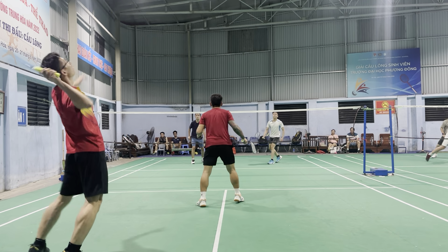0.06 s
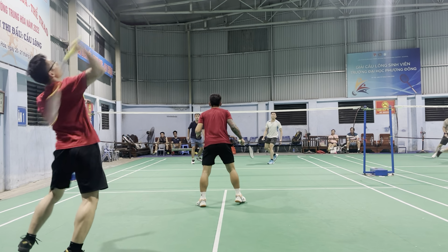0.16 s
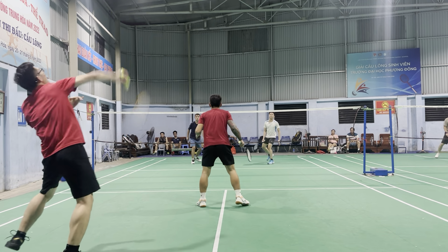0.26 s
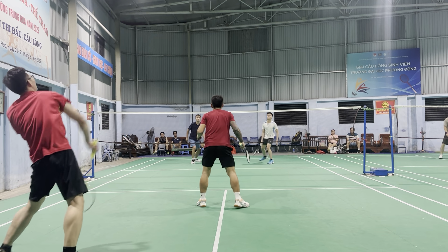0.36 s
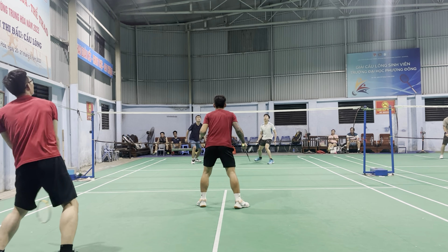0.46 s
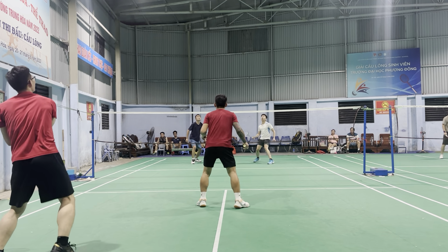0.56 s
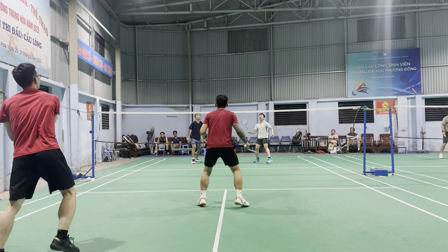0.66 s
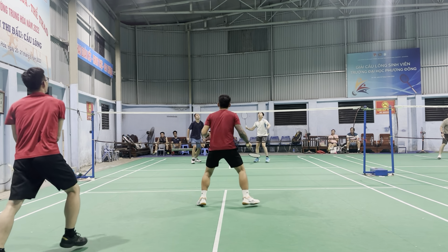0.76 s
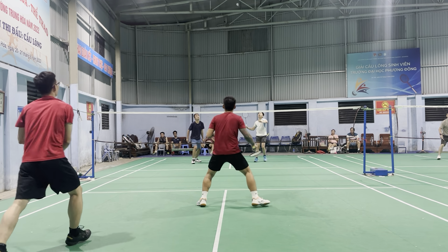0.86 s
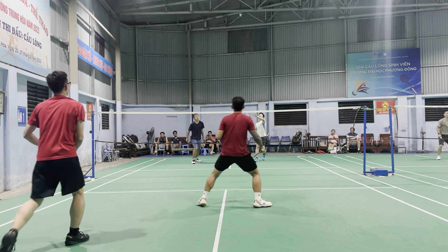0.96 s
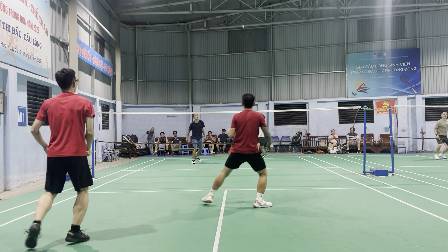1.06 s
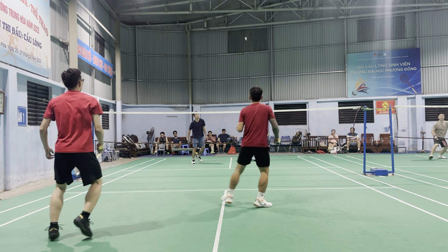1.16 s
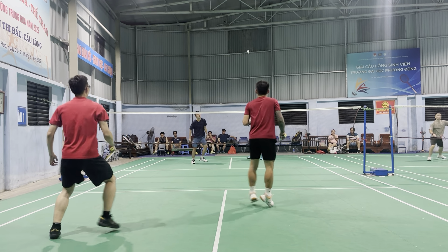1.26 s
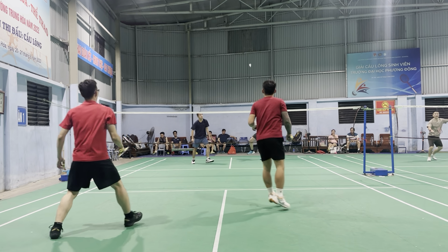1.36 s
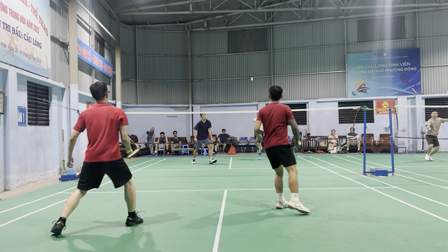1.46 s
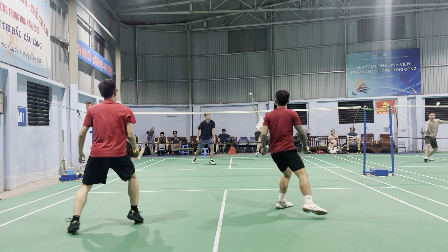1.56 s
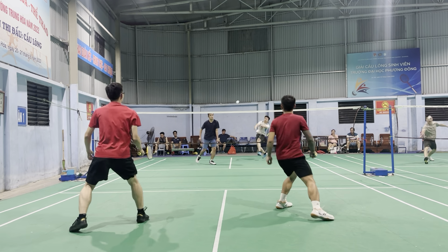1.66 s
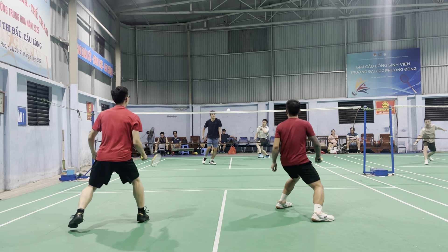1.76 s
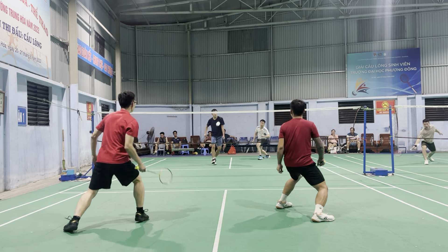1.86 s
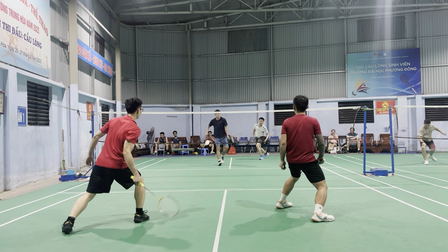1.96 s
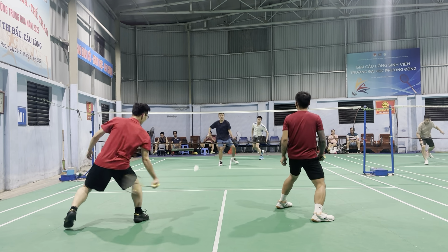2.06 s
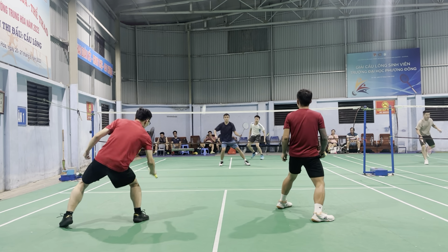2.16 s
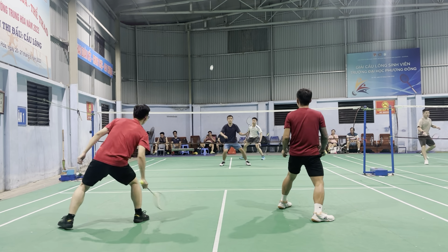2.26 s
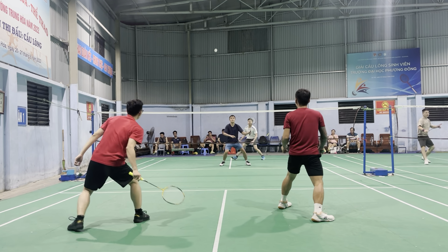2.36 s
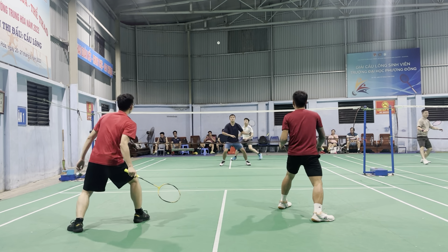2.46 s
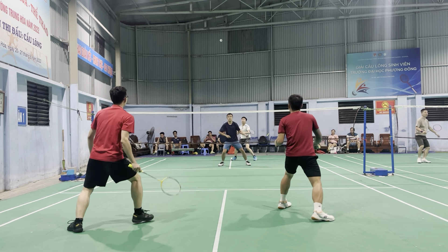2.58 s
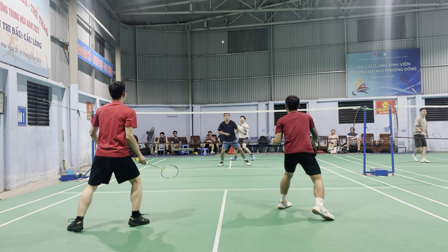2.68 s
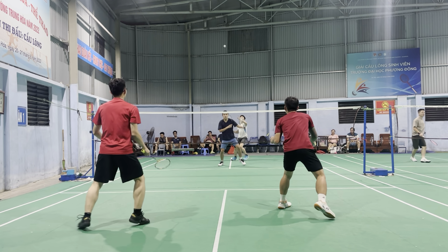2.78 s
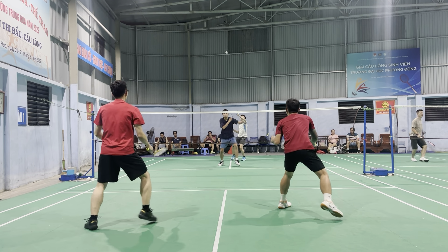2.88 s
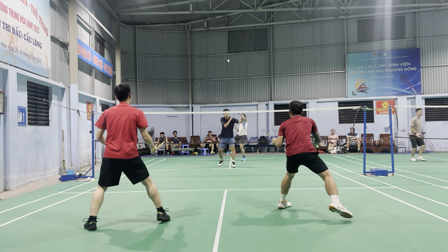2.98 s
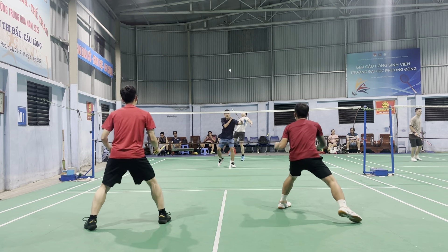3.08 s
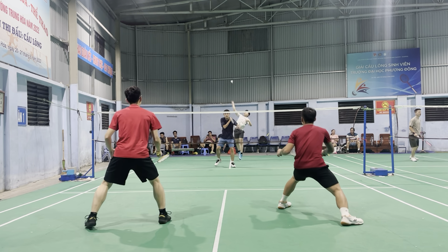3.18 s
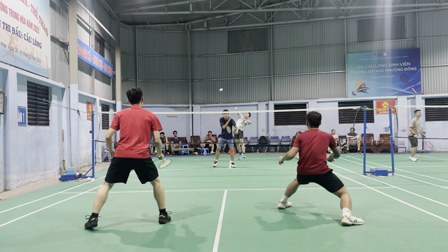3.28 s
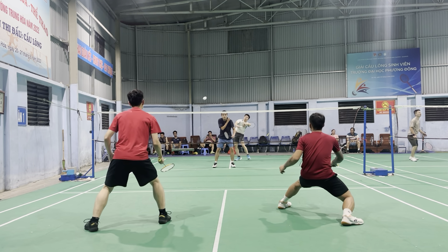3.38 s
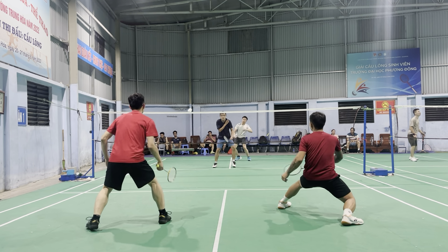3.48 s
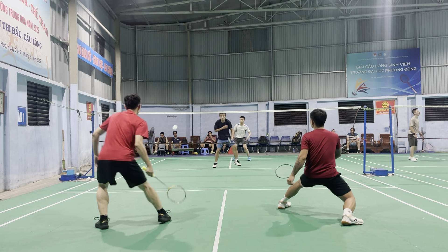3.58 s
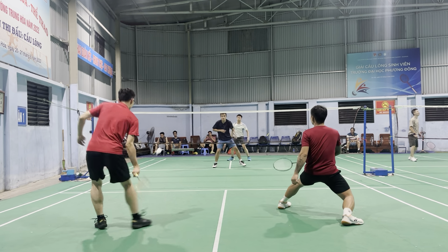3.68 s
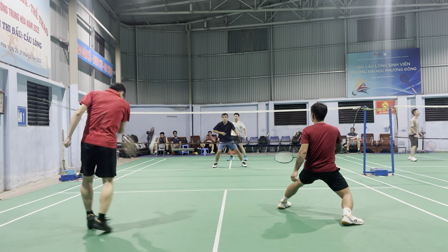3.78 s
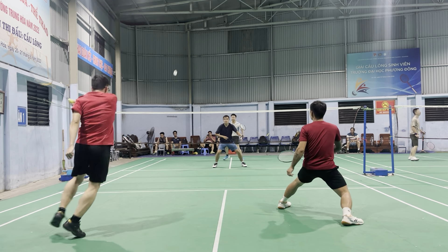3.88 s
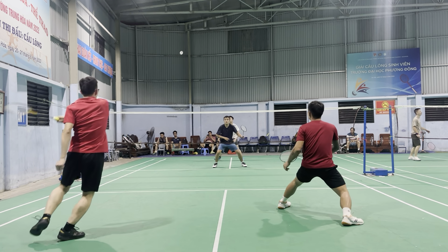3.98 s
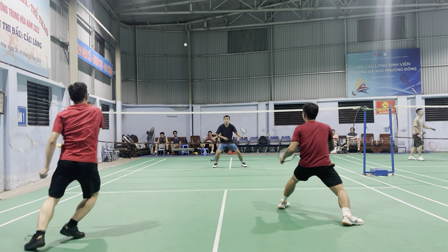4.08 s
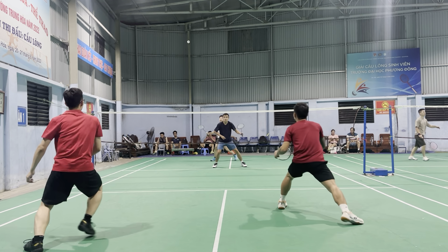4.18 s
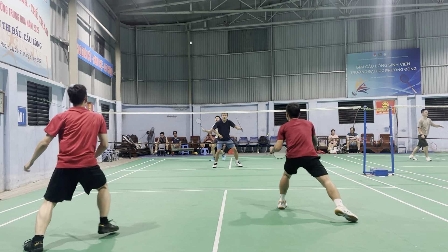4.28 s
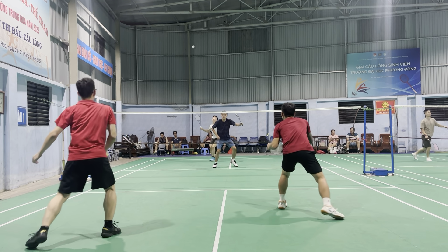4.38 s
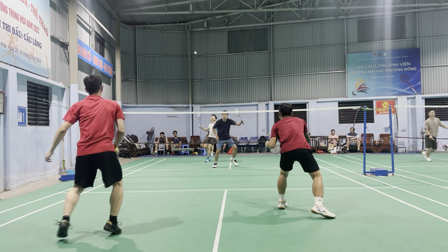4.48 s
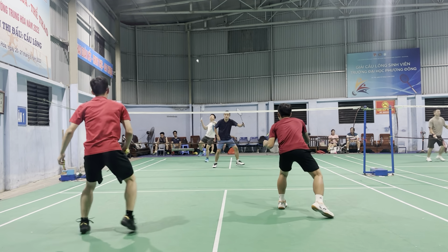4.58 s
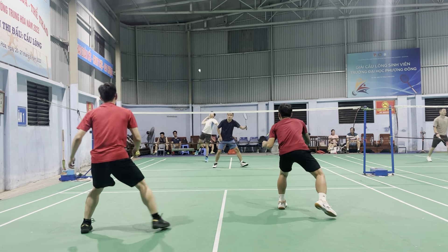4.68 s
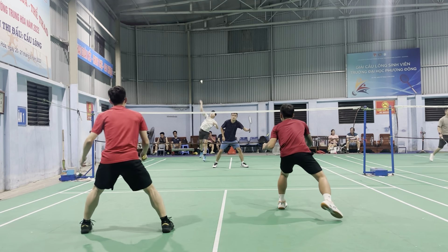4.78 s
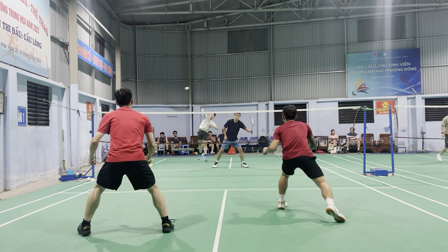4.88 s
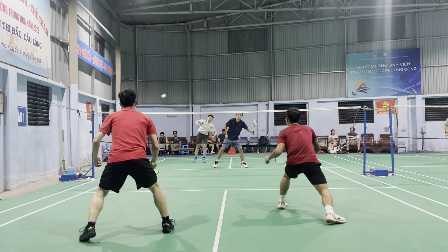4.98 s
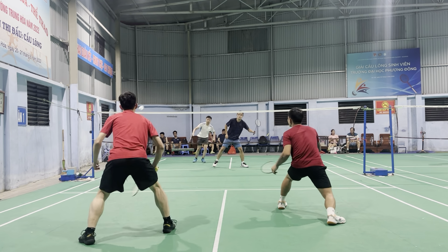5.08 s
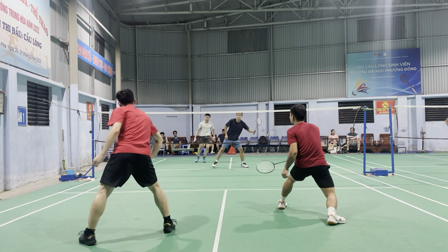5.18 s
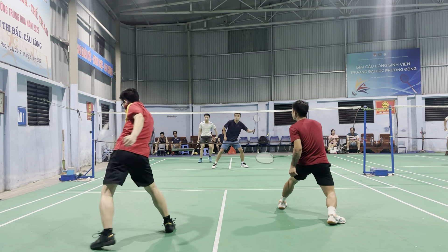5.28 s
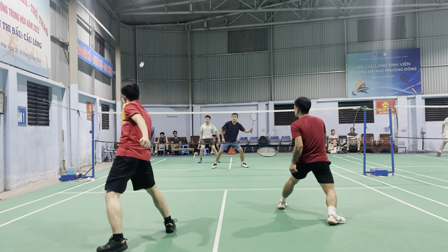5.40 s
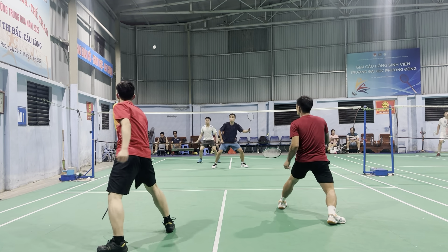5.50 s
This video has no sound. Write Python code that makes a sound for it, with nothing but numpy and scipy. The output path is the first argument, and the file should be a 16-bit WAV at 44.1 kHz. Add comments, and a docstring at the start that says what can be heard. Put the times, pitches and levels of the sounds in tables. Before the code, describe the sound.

A badminton doubles rally cracks through a large metal hall, with shoe scuffs and squeaks over steady hum and a low engine throb that fades.

```python
"""Steady hall noise and a slow engine's throb, probably a motorbike outside, run under a badminton rally.
The place is a large sheet-metal hall, heard by a close microphone pair behind the near court of a doubles game.
Each stroke is a string-bed thud of decaying sines and a flat-spectrum crack of cork and feathers,
thrown back by floor, walls and a long reverberation of decaying noise bands.
Shoes scuff in grainy noise and squeak in gliding tones; the engine is a train of pulses ringing its exhaust."""
import sys
import numpy as np
from scipy import signal
from scipy.fft import rfft, irfft, next_fast_len
from scipy.io import wavfile
from scipy.ndimage import uniform_filter1d

SR = 44100
rng = np.random.default_rng(int(sys.argv[2]) if len(sys.argv) > 2 else 0)


def generate_wav(signal):
    """Clip the signal to [-1, 1] and save it as 16-bit WAV at the path in sys.argv[1]."""
    frames = np.transpose(np.atleast_2d(signal))
    scaled = np.clip(frames, -1, 1) * 32767
    pcm = np.round(scaled).astype(np.int16)
    wavfile.write(sys.argv[1], SR, pcm)


N = 244314
TIME = np.arange(N) / SR
FREQS = np.fft.rfftfreq(N, 1 / SR)


def undb(db):
    """Decibels to gain."""
    return 10 ** (np.asarray(db) / 20)


def contour(points, hz):
    """Values of (frequency [Hz], value) points joined on a log-frequency axis."""
    at, value = np.transpose(points)
    return np.interp(np.log(hz + 1), np.log(at), value)


def colour(x, points):
    """Filter by a (frequency [Hz], gain [dB]) curve."""
    length = x.shape[-1]
    size = next_fast_len(length + 2048)  # padded so the filter's tail does not wrap round
    gain = undb(contour(points, np.fft.rfftfreq(size, 1 / SR)))
    return irfft(rfft(x, size) * gain, size)[..., :length]


def unit(x):
    """Scale to rms 1."""
    return x / np.sqrt(np.mean(x ** 2))


def ring(modes, t):
    """Struck modes (frequency [Hz], level [dB], t60 [s]) as decaying sines."""
    return sum(undb(db - 60 * t / t60) * np.sin(2 * np.pi * hz * t) for hz, db, t60 in modes)


def add(track, at, sound, pan_db=0):
    """Mix a sound into a stereo track at a time [s]; positive pan leans left."""
    start = max(int(at * SR), 0)
    panned = sound * undb([[pan_db / 2], [-pan_db / 2]])
    part = panned[:, :max(N - start, 0)]
    track[:, start:start + part.shape[1]] += part


def walk(rate):
    """Smooth random drift of rms 1 or near it, with a new target at the given rate [per s]."""
    hold = int(SR / rate)
    steps = np.repeat(rng.standard_normal(N // hold + 1), hold)
    return unit(uniform_filter1d(steps, hold)[:N])


# the hall's steady noise: (frequency [Hz], level [dB per Hz])
NOISE_SPECTRUM = [(22, -99), (42, -93), (65, -50), (105, -67.5), (170, -59.5), (270, -60.5), (420, -68),
                  (1000, -72.5), (2000, -81.5), (3200, -85.5), (5000, -87), (7500, -99), (13000, -102),
                  (16000, -114)]


def ambience(drift_db=0.5):
    """Diffuse noise of fans and traffic, independent in each channel, swelling slightly."""
    noise = colour(rng.standard_normal((2, N)), NOISE_SPECTRUM) * np.sqrt(SR / 2)
    return noise * undb(drift_db * walk(2.66))


# the engine idles, and is opened up once; rates in firings per second
IDLE_HZ, IDLE_WANDER_HZ = 20.966, .3
REV_AT_S, REV_WIDTH_S, REV_RISE_HZ = 2.95, .5, 3.1
# its throb holds, then fades to a faint remainder as it moves off, wavering a little on the way
NEAR_DB, FAR_DB, LEAVES_S, RECEDE_S, THROB_WAVER_DB = -28.5, -40, 0.83, 2.3, 1.44
# a deep boom at twice the firing rate grows with the rev and wavers
BOOM_DB, BOOM_DB_PER_HZ, BOOM_WAVER_DB = -49, 3.5, 3.5
# exhaust resonances: (frequency [Hz], relative level [dB], t60 [s])
EXHAUST_MODES = [(107.8, -4.5, 0.098), (133.3, 5.5, 0.036), (156, -15.5, 0.029)]


def engine(start_phase=.6, scatter_db=4.0, jitter_s=.0011, bark_db=-46, throttle_db=2.0):
    """One cylinder fires into its exhaust; the walls pass only the lows; throttle adds a bark and a boom."""
    rev = REV_RISE_HZ * np.exp(-((TIME - REV_AT_S) / REV_WIDTH_S) ** 2)
    rate = IDLE_HZ + rev + IDLE_WANDER_HZ * walk(2.5)
    receding = np.clip((TIME - LEAVES_S) / RECEDE_S, 0, 1)
    throb_curve = NEAR_DB + (FAR_DB - NEAR_DB) * receding + THROB_WAVER_DB * walk(4.96)
    boom_curve = BOOM_DB + BOOM_DB_PER_HZ * rev + BOOM_WAVER_DB * walk(6.76)

    # one pulse per firing, uneven in time and strength
    turns = start_phase + np.cumsum(rate) / SR
    firings = np.flatnonzero(np.diff(np.floor(turns)))
    chance = rng.standard_normal((len(firings), 2))
    jitter = (chance[:, 0] * jitter_s * SR).astype(int)
    pulses = np.zeros(N)
    pulses[np.clip(firings + jitter, 0, N - 1)] = undb(scatter_db * chance[:, 1])

    throb = signal.fftconvolve(pulses, ring(EXHAUST_MODES, TIME[:SR // 4]))[:N]
    throb = unit(colour(throb, [(30, -16), (75, -6.0), (110, -3.5), (160, 1), (210, -5.0), (500, -72)]))
    bark = unit(colour(pulses, [(100, -59), (170, -8.0), (250, -2), (340, -11.5), (700, -36.0), (4000, -100)]))
    boom = np.sqrt(2) * np.sin(4 * np.pi * turns)
    # the bark follows the throttle [dB per Hz] and, half as strongly, the nearness of the engine
    nearness_db = throb_curve - throb_curve.mean()
    bark_curve = bark_db + throttle_db * (rate - rate.mean()) + nearness_db / 2
    pipe = throb * undb(throb_curve) + bark * undb(bark_curve)
    return pipe, boom * undb(boom_curve)


# hall reverberation by band: (frequency [Hz], relative level [dB], t60 [s])
HALL_BANDS = [(58.6, -23, 1.04), (236, -20, 1.64), (474, -28.5, 3.7), (870, -27, 1.72), (1550, -26, 2.15),
              (3200, -27.5, 1.39), (5270, -23, 1.76), (8000, -43.5, 0.63), (11100, -27.5, 0.98),
              (17000, -32, 0.4)]


def hall(x, build_s=0.0024, early_db=3, early_s=0.095):
    """Diffuse reverberation: noise bands die at their own rates, and nearby surfaces strengthen the start."""
    size = 2 ** 17
    t, hz = TIME[:size], np.fft.rfftfreq(size, 1 / SR)
    noise, response = rfft(rng.standard_normal((2, size))), 0
    centres = np.array(HALL_BANDS)[:, 0]
    for (_, db, t60), own in zip(HALL_BANDS, np.eye(len(HALL_BANDS))):
        # a peak of 1 at its own centre, falling to 0 at the neighbouring ones
        band = contour(np.column_stack([centres, own]), hz)
        response = response + irfft(noise * band) * undb(db - 60 * t / t60)
    response = response * (1 - np.exp(-t / build_s)) * undb(early_db * np.exp(-t / early_s))
    return signal.fftconvolve(x, response, axes=1)[:, :N]


# light shuffling at loose intervals; the spread is either way of the level
SHUFFLES_PER_S, SHUFFLE_DB, SHUFFLE_SPREAD_DB, SHUFFLE_S, SHUFFLE_BRIGHT_DB = 3, -61, 2.5, .03, 8


def shuffles():
    """Faint scuffs at loose intervals, as rows like those of the clear scuffs."""
    count = int(SHUFFLES_PER_S * N / SR)
    rows = []
    for k, (when, size) in enumerate(rng.random((count, 2))):
        db = SHUFFLE_DB + SHUFFLE_SPREAD_DB * (2 * size - 1)
        rows.append(((k + when) / SHUFFLES_PER_S, db, SHUFFLE_S, SHUFFLE_BRIGHT_DB))
    return rows


# the clearest shoe scuffs on the court mat, levels before colouring; the first row is not a scuff but a dull
# swell that trails the first stroke: # (time [s], level [dB], length [s], brightness [dB])
CLEAR_SCUFFS = [(0.453, -30.5, 0.12, -17), (0.918, -37, 0.01, -1), (1.202, -42.5, 0.044, -2),
                (1.379, -43, 0.037, -2), (1.983, -25.5, 0.013, -14), (3.24, -24.5, 0.017, -14),
                (3.641, -48, 0.082, 8), (3.732, -38.5, 0.12, -6.5), (4.624, -51.5, 0.018, 13.5),
                (5.243, -29.5, 0.036, -9.5)]


def scuffs(grain_db=4, rise_s=0.001):
    """Soles rasp over the mat in grainy noise bursts."""
    out = np.zeros((2, N))
    t = TIME[:SR // 3]
    for at, db, length, bright_db in list(CLEAR_SCUFFS) + shuffles():
        grains = rng.standard_normal(len(t)) * undb(grain_db * walk(700)[:len(t)])
        treble = [(6500, -8 + bright_db / 2), (12000, bright_db), (16500, bright_db - 13)]
        rasp = colour(unit(grains), [(200, 6), (1200, 6.5), (3000, -4.5)] + treble)
        swell = (1 - np.exp(-t / rise_s)) * np.exp(-(t / length) ** 2)
        add(out, at, undb(db) * rasp * swell)
    return out


# rubber soles squeaking: (time [s], pitch [Hz], level [dB], length [s])
SOLE_SQUEAKS = [(2.585, 4590, -53, 0.044), (2.628, 4470, -41, 0.026), (2.645, 4480, -55.5, 0.2),
                (3.692, 3100, -33.5, 0.017), (3.741, 2570, -39.5, 0.03), (4.35, 4620, -55, 0.124),
                (5.254, 6300, -42, 0.01)]


def squeaks(glide=0.012, waver=0.016, flutter_db=3):
    """Soles stick and slip fast enough to sing; the tone flutters and sinks slightly."""
    out = np.zeros((2, N))
    t = TIME[:SR // 3]
    for at, hz, db, length in SOLE_SQUEAKS:
        slide = np.minimum(t / length, 1)
        # glide and waver are fractions of the pitch
        pitch = hz * (1 - glide * (slide - .5) + waver * walk(440)[:len(t)])
        grip = undb(db + flutter_db * walk(103)[:len(t)]) * np.sin(np.pi * slide)
        add(out, at, grip * np.sin(2 * np.pi * np.cumsum(pitch) / SR))
    return out


def swish(rise_s=0.014):
    """Air hisses through the strings, swelling as the racket head speeds up."""
    t = TIME[:SR // 10]
    hiss = colour(rng.standard_normal(len(t)),
                  [(300, 6), (1500, -1), (5000, -13), (13000, -3), (16500, -10)])
    return hiss * np.exp((t - t[-1]) / rise_s)


def scatter(x, spread_s):
    """A ribbed surface returns many small echoes, different in each ear, of the same total energy."""
    t = TIME[:SR // 8]
    echoes = rng.standard_normal((2, len(t))) * (t / spread_s) * np.exp(-t / spread_s)
    return signal.fftconvolve(x[None], unit(echoes) / np.sqrt(len(t)), axes=1)


OVERTONES_DB_PER_HALVING = 3  # a contact half as long brings out the overtones of the bed
# string bed damped by the shuttle: (multiple of its pitch, relative level [dB], t60 after a 1 ms contact [s])
BED_MODES = [(1, 0, 0.0052), (1.55, -15, 0.013), (1.95, -10, 0.0072), (2.65, -2, 0.0031), (3.9, -33, 0.022)]
# strings and frame ringing on once the shuttle has left: (frequency [Hz], relative level [dB], t60 [s])
FRAME_MODES = [(796, -35, 0.047), (930, -23, 0.016), (1147, -31, 0.13), (1615, -47, 0.11),
               (1869, -28, 0.054), (2363, -34.5, 0.055)]


def stroke(thud_db, pitch_hz, contact_ms, crack_db, crack_s=0.00093):
    """Cork sinks into the string bed, feathers crack against it, and the freed strings ring briefly."""
    t = TIME[:SR // 5]
    # a shorter, harder contact gives a drier and broader pock
    overtones_db = -OVERTONES_DB_PER_HALVING * np.log2(contact_ms)
    bed = [(pitch_hz * ratio, db + overtones_db * (k > 0), t60 * np.sqrt(contact_ms))
           for k, (ratio, db, t60) in enumerate(BED_MODES)]
    ringing = ring(bed, t) + np.sqrt(contact_ms) * ring(FRAME_MODES, t)
    thud = ringing * (1 - np.exp(-1000 * t / contact_ms))
    burst = rfft(rng.standard_normal(len(t)) * np.sqrt(t) * np.exp(-t / crack_s))
    # the crack's spectrum is flattened so that it holds all frequencies evenly, before its colouring
    snap = irfft(burst / np.abs(burst), len(t)) * np.exp(-(t / (10 * crack_s)) ** 2)
    crack = colour(snap, [(150, 3.5), (450, 11.5), (2200, 3.0), (4200, -3.0),
                          (8000, -3.0), (13000, 1.5), (16500, -16)])
    return undb(thud_db) * thud, undb(crack_db) * crack


# racket strokes; those caught near the frame clack higher:
# (time [s], thud level [dB], string-bed pitch [Hz], contact [ms], crack level [dB],
#  floor bounce lag [ms], wall echo level [dB], hall level [dB], left minus right [dB])
RALLY_STROKES = [(0.239, 0, 808, 0.41, 1, 11.4, -6.5, -2.5, 12.5),
                 (1.6185, 1.5, 987, 0.75, 5.5, 8.6, -29, -5.5, 2),
                 (2.146, -12.5, 1080, 0.34, -7.5, 10, -4, -5, 4),
                 (3.1718, -13.5, 2395, 2.3, -5.5, 11, -26, 1.5, -14),
                 (3.2798, -0.5, 1052, 1.5, 2, 7.4, -12, -1, 10),
                 (3.7909, -11, 1710, 0.93, -8, 10, -3.5, -9, 12.5),
                 (4.3420, -24.5, 930, 1.2, -13, 7.9, -10, -0.5, -8),
                 (4.8809, 5.5, 998, 0.92, 5.5, 4.76, -70, -5.5, 13.5),
                 (5.298, -12.5, 860, 0.79, -11.5, 10, -4.5, -2.5, -1)]


def rally(floor_db=-5, side_wall_s=0.0032, end_wall_s=.096, end_wall_db=0, return_db=-5,
          clutter_db=-5, swish_db=-39):
    """Each stroke arrives directly, off the floor, off the side and end walls, and off posts and benches."""
    near, thuds, cracks = (np.zeros((2, N)) for _ in range(3))
    for at, thud_db, pitch_hz, contact_ms, crack_db, floor_ms, wall_db, hall_db, pan_db in RALLY_STROKES:
        thud, crack = stroke(thud_db, pitch_hz, contact_ms, crack_db)
        hit = thud + crack
        dull = colour(hit, [(1500, 1), (5000, -1.5), (13000, -5)])
        swing = swish()
        # the swing ends as the hit begins
        add(near, at - len(swing) / SR, undb(crack_db + swish_db) * swing, pan_db)
        add(near, at, hit, pan_db)
        add(near, at + floor_ms / 1000, undb(floor_db) * dull, pan_db)
        add(near, at + side_wall_s, undb(wall_db) * dull, pan_db=-8.5)
        add(near, at + side_wall_s, undb(clutter_db) * scatter(dull, spread_s=0.012))
        # the slap runs between the ribbed end walls, weaker on its return
        slap = undb(wall_db + end_wall_db) * colour(dull, [(1200, 9.0), (3000, -20.0), (12000, -21)])
        add(near, at + end_wall_s, scatter(slap, spread_s=0.0041))
        add(near, at + 2 * end_wall_s, undb(return_db) * scatter(slap, spread_s=0.025))
        # what goes out into the hall's reverberation
        add(thuds, at, undb(hall_db) * thud)
        add(cracks, at, undb(hall_db) * crack)
    return near, thuds, cracks


def scene(scuff_hall_db=-6, squeak_hall_db=-13, engine_hall_db=-12):
    """Strokes, shoes and the engine's pipe share the one hall; its boom and the steady noise stay dry."""
    near, thuds, cracks = rally()
    rasps, chirps = scuffs(), squeaks()
    pipe, boom = engine()
    # string bed and feathers radiate in different directions, so they reach the ear by unrelated paths
    thud_reverb = hall(thuds + undb(engine_hall_db) * pipe)
    shoes = undb(scuff_hall_db) * rasps + undb(squeak_hall_db) * chirps
    crack_reverb = hall(cracks + shoes)
    return near + rasps + chirps + pipe + boom + thud_reverb + crack_reverb + ambience()


TOP_HZ = 16000  # upper limit of the microphones' band
# width heard by the close microphone pair: (frequency [Hz], side gain [dB])
PAIR_WIDTH = [(50, -23), (120, -10.5), (260, -5), (1000, 1.5), (2000, -1), (4400, -5.5), (6500, 4.5),
              (8200, -120), (11000, -71), (15000, 7)]
# sensitivity of the pair: (frequency [Hz], left minus right [dB])
PAIR_BALANCE = [(200, 2.5), (1000, 0.6), (2200, 0.5), (4400, -6.5), (7500, 3.5), (13000, 1)]


def record(dry, port_hz=8400, port_width_hz=3000, low_cut_hz=36):
    """Two close microphones hear bass alike; a port resonance turns one's phase; peaks round, both ends cut."""
    left, right = rfft(dry)
    mid = (left + right) / 2
    side = (left - right) / 2 * undb(contour(PAIR_WIDTH, FREQS))
    lean = undb(contour(PAIR_BALANCE, FREQS) / 2)
    port = port_hz ** 2 - FREQS ** 2 + 1j * FREQS * port_width_hz
    all_pass = port.conj() / port  # turns phase, leaves level
    pair = irfft(np.array([(mid + side) * lean, (mid - side) / lean * all_pass]), N)
    low_cut = signal.butter(4, low_cut_hz, "high", fs=SR, output="sos")
    pair = signal.sosfilt(low_cut, np.tanh(pair))
    return signal.sosfilt(signal.ellip(8, .2, 70, TOP_HZ, fs=SR, output="sos"), pair)


dry = scene()
out = record(dry)
generate_wav(out)
```